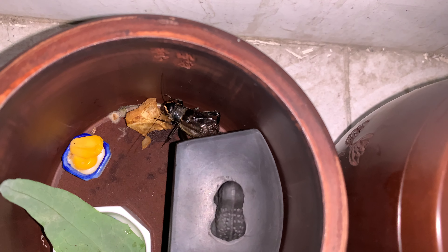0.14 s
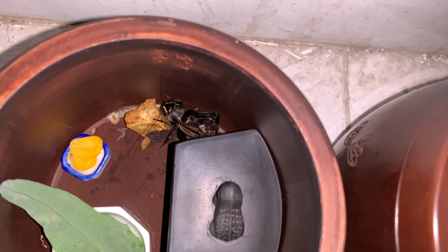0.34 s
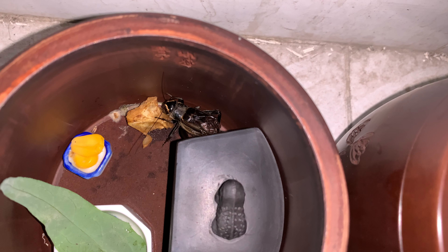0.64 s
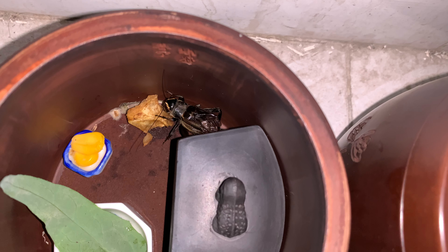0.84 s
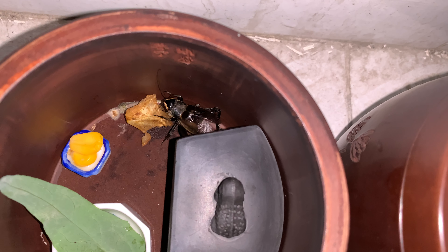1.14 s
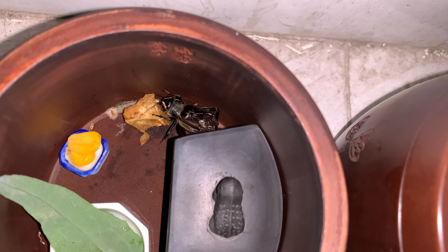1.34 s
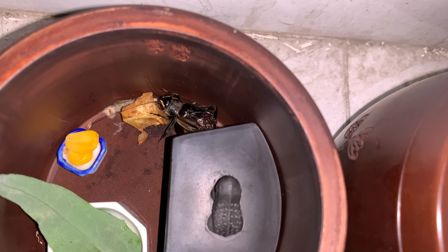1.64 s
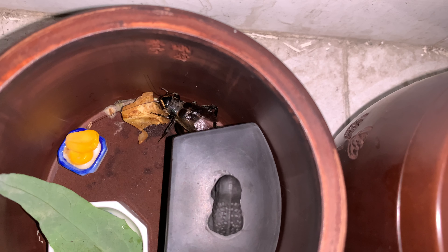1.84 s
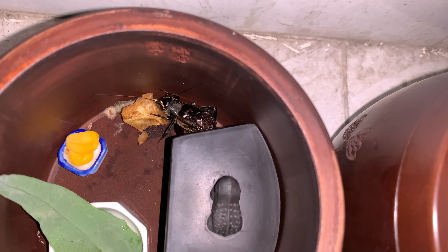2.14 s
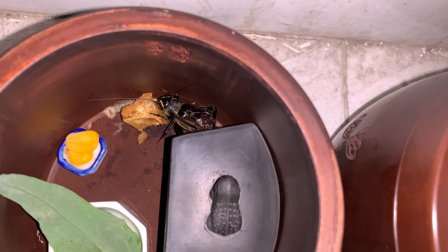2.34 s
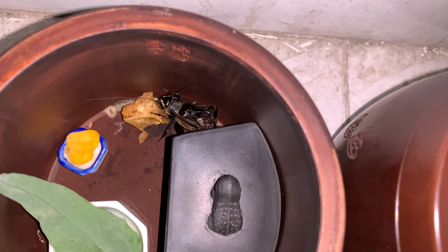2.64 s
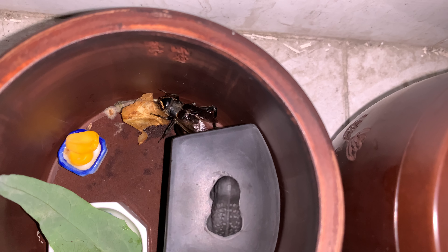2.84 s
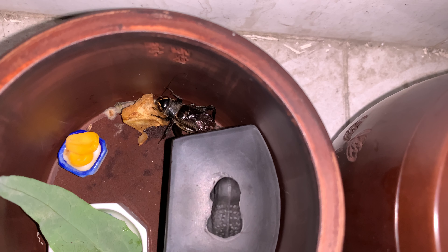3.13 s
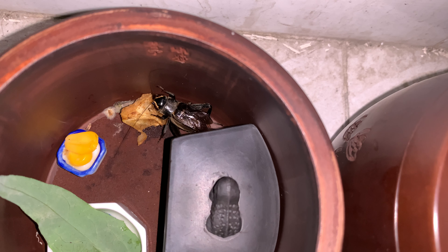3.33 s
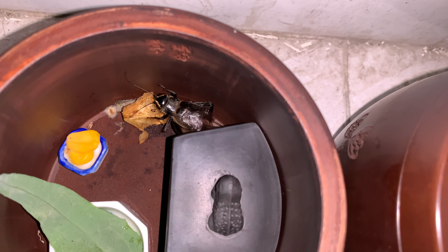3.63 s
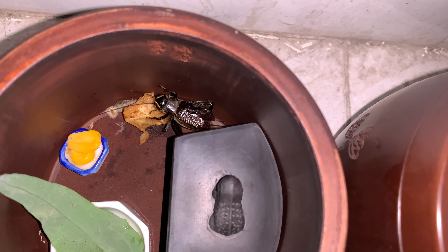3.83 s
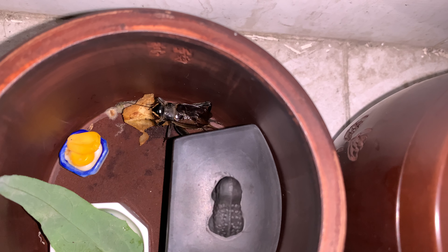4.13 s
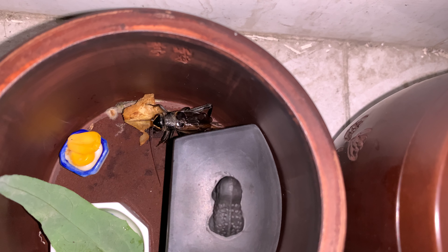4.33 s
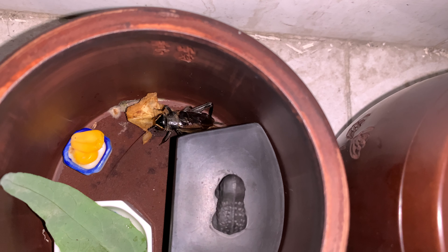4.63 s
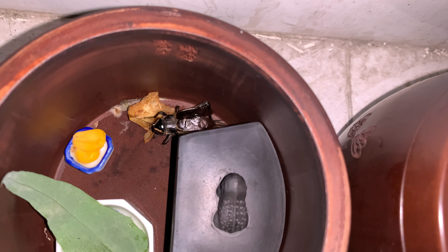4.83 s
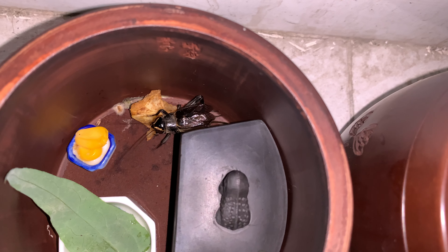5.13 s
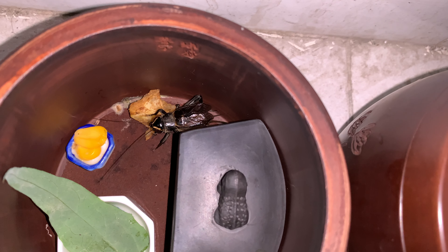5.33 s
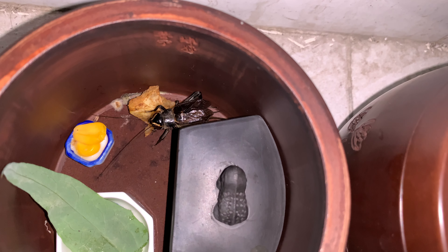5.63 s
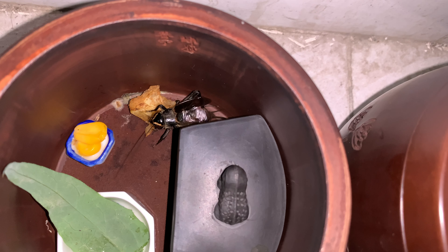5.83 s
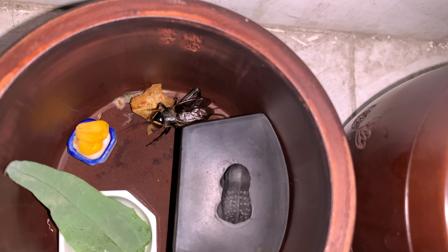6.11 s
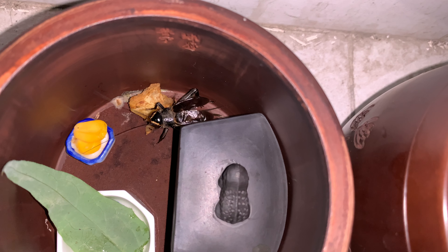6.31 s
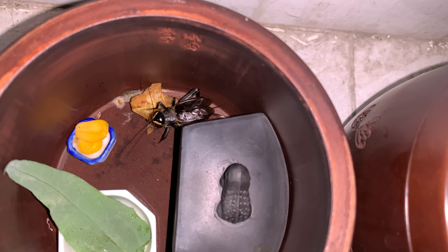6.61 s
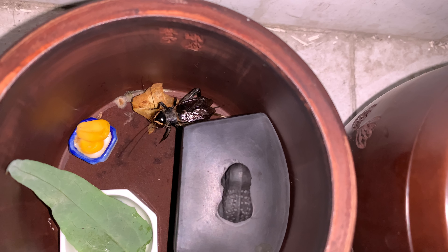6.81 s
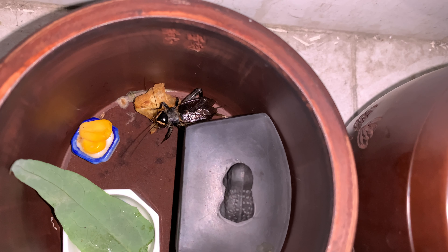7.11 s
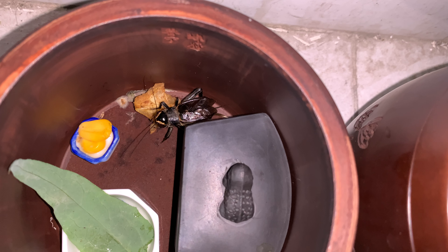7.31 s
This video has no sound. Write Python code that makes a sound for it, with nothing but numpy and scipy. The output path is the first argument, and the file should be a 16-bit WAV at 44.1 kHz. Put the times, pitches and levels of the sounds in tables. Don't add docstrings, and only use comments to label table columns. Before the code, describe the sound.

Loud piercing cricket chirps, each a quick run of raspy pulses, ring inside a clay jar indoors; faint double-pulsed chirps fill some gaps above low room rumble.

```python
import sys
import numpy as np
from scipy import signal
from scipy.fft import rfft, irfft, next_fast_len
from scipy.io import wavfile
from scipy.ndimage import uniform_filter1d, map_coordinates

SR = 44100
rng = np.random.default_rng(int(sys.argv[2]) if len(sys.argv) > 2 else 0)


def invert_db(level):
    return 10 ** (np.asarray(level, dtype=float) / 20)


def generate_wav(sig):
    pcm = np.round(np.clip(np.atleast_2d(sig).T, -1, 1) * 32767).astype(np.int16)
    wavfile.write(sys.argv[1], SR, pcm)


N = 328986


def unit(x):
    return x / np.sqrt(np.mean(x ** 2) + 1e-20)


def along(points, hz):
    point_hz, value = np.transpose(points)
    return np.interp(np.log(hz + 1), np.log(point_hz + 1), value)


def filtered(x, response):
    size = next_fast_len(N + 8192)
    spectrum = rfft(x, size) * response(np.fft.rfftfreq(size, 1 / SR))
    return irfft(spectrum, size)[..., :N]


def noise(spectrum):
    white = rng.standard_normal(N)
    return unit(filtered(white, lambda hz: invert_db(along(spectrum, hz))))


def wobble(rate):
    knots = rng.standard_normal(int(N * rate / SR) + 4)
    return unit(map_coordinates(knots, [np.arange(N) * rate / SR]))


def patchy(x, depth_db):
    z = signal.stft(x, nperseg=128)[2]
    field = uniform_filter1d(rng.standard_normal(z.shape), size=3, axis=0)
    field = uniform_filter1d(field, size=3, axis=1)
    return unit(signal.istft(z * invert_db(depth_db * unit(field)), nperseg=128)[1][:N])


def add(track, s, piece):
    track[round(s * SR):][:len(piece)] += piece


# level in dB, t60 in seconds.
EARLIER_TAIL = (-53.5, .7)


def earlier():
    db, t60 = EARLIER_TAIL
    ring = noise([(3800, -39), (4050, -3), (4300, 0.5), (4450, -4), (4650, -41.5)])
    return invert_db(db - 60 * np.arange(N) / SR / t60) * ring


# frequency in Hz, density in dB per Hz.
HISS_SPECTRUM = [(2500, -35), (3300, -5), (4600, -2), (5400, -11.5), (7000, -16.5), (9000, -18),
                 (11000, -24), (14000, -15), (15200, -33.5), (15500, -39.5)]


def hiss():
    return invert_db(-78.0) * noise(HISS_SPECTRUM)


# time in seconds, level in dB, relative deep rumble in dB.
VENTILATION = [(0.0, -51.5, 0.5), (0.899, -54.5, -1), (1.7, -53.5, 0), (2.299, -54.5, 0.5),
               (2.9, -54.5, 2.5), (3.4, -54.5, -1.5), (4.3, -56, 0.5), (5.0, -55.5, 4), (5.6, -56.5, -1),
               (6.4, -55.5, 1.5), (7.46, -55.5, -2.5)]
# frequency in Hz, density in dB per Hz.
HUM_COMMON = [(15, -54), (25, -22), (66, 1.5), (119, 0.5), (173, -7), (208, -5.5), (240, -9.5), (271, -8),
              (418, -16.5), (524, -22), (713, -19), (1100, -21), (1240, -18.5), (1590, -23.5),
              (3400, -38.5), (4420, -60), (7480, -120)]
# frequency in Hz, density in dB per Hz.
HUM_DIFFERENCE = [(35, -42.5), (60, -9), (220, -8), (289, -2), (448, -3.5), (731, -1.5), (823, -5.5),
                  (1260, -7), (1820, -12.5), (3400, -19), (4420, -55), (7480, -120)]
# centre in Hz, width in Hz, gain in dB.
MODES = [(70, 2.9, 7), (424, 23, 6), (866, 68, -10), (1980, 140, 3.5)]
# frequency in Hz, left minus right in dB.
BALANCE = [(60, 0), (110, -0.5), (200, 2), (380, -1.5), (700, -2.0), (1290, -0.5), (2380, -0.5),
           (4400, -1.5), (8120, 1.5), (15000, -5)]


def room(song):
    duck_db, duck_s, loud_db = 6, .12, -18
    s, db, deep_db = np.transpose(VENTILATION)
    now = np.arange(N) / SR
    keep = np.exp(-1 / (duck_s * SR))
    loud = signal.lfilter([1 - keep], [1, -keep], np.abs(song)) / invert_db(loud_db)
    level = invert_db(np.interp(now, s, db) + 3.5 + 0.66 * wobble(8) - duck_db * np.tanh(loud))
    mid, side = noise(HUM_COMMON), invert_db(-12) * noise(HUM_DIFFERENCE)
    mid = filtered(mid, lambda hz: invert_db(sum(gain * np.exp(-((hz - c) / w) ** 2) for c, w, gain in MODES)))
    deep = filtered(mid, lambda hz: 1 / (1 + (hz / 105) ** 6))
    mid = mid + deep * (invert_db(np.interp(now, s, deep_db - np.mean(deep_db))) - 1)
    left_right = np.array([mid + side, mid - side])
    return level * filtered(left_right, lambda hz: invert_db(np.outer([.5, -.5], along(BALANCE, hz))))


# start in seconds, peak in dB, extra low ring in dB.
SCRAPER_CATCHES = [(0.0392, -39, 14.5), (1.1046, -33.5, -4.5), (1.2052, -32.5, -15.5), (1.2163, -16, -2.5),
                   (1.6944, -61, -8), (1.9051, -33.5, -2), (1.9565, -30, 1), (1.9986, -29.5, -7),
                   (2.0074, -24.5, 1.5), (2.8971, -32, -4), (2.9225, -35, 7.5), (2.9582, -24, -2),
                   (3.588, -25, -9), (4.8845, -43, -3), (4.8991, -20, 0), (4.9357, -23, -2.5),
                   (4.974, -36, -12), (4.9835, -17, -8), (4.9937, -18.5, -8), (5.7986, -44, -8),
                   (5.8054, -44, 3), (5.8456, -45, 16), (6.3574, -40.5, 8), (6.3754, -33, -2)]


def catches():
    t = np.arange(SR // 10) / SR
    scrape, ring = np.zeros(N), np.zeros(N)
    for s, db, ring_db in SCRAPER_CATCHES:
        add(scrape, s, invert_db(db - 3.0 - 60 * t / .024) * (1 - np.exp(-t / 0.0015)))
        add(ring, s, invert_db(db + ring_db - 15.5 - 60 * t / 0.14) * (1 - np.exp(-t / 0.0007)))
    return scrape, ring


# start in seconds, length in seconds,
# starting tooth rate in Hz, peak in dB, level near the end in dB.
OPENING_STROKES = [(0.0546, 0.021, 4430, -16.5, -21.5), (0.084, 0.0262, 4493, -16, -19.5),
                   (0.115, 0.026, 4497, -15, -17.5), (0.148, 0.028, 4493, -12.5, -16.5),
                   (0.1828, 0.0306, 4330, -10, -19), (1.126, 0.0217, 4440, -19, -24),
                   (1.165, 0.025, 4450, -17.5, -17), (1.9247, 0.017, 4420, -19, -21.5),
                   (1.9592, 0.031, 4446, -12, -17.5), (2.9192, 0.02, 4493, -18.5, -22.5),
                   (2.956, 0.04, 4560, -8.5, -22), (3.594, 0.011, 3980, -14, -21),
                   (3.625, 0.024, 4250, -10.5, -19.5), (3.6648, 0.03, 4460, -8.5, -15.5),
                   (4.9372, 0.0261, 4527, -17, -15.5), (4.9747, 0.036, 4765, -7, -16.5),
                   (5.8073, 0.021, 4383, -22, -19), (5.8443, 0.033, 4740, -9, -12.5),
                   (6.3775, 0.017, 4585, -19, -23), (6.4052, 0.03, 4633, -15, -15),
                   (6.4475, 0.033, 4590, -9, -13)]
# end in seconds, peak in dB, level near the end in dB.
FULL_STROKES = [(1.2424, -7, -39.5), (1.29, -9, -21), (1.3382, -8.5, -27), (1.3888, -8.5, -20.5),
                (2.0387, -6.5, -21), (2.0838, -7.5, -28.5), (2.1344, -10, -24), (3.0391, -7.5, -23.5),
                (3.0872, -8.5, -21.5), (3.1344, -9, -19), (3.7925, -10.5, -23.5), (5.0606, -8, -19.5),
                (5.1121, -10, -19), (5.163, -11, -17.5), (5.9241, -8, -18.5), (5.9733, -9.5, -17),
                (6.0223, -10.5, -15.5), (6.5285, -8.5, -18.5), (6.5736, -9, -14.5)]
# start in seconds, length in seconds, starting tooth rate in Hz,
# peak in dB, level near the end in dB, octave in dB.
SLIPPED_STROKE = (3.7088, .041, 4500, -6.5, -15, -29)


def strokes():
    rows = []
    for s, length, start_hz, peak_db, late_db in OPENING_STROKES:
        rows.append((s, length, start_hz, peak_db, late_db, -29.5 + 0.68 * (late_db + 17)))
    full_s, full_hz = .0355, 4587
    for end, peak_db, late_db in FULL_STROKES:
        octave_db = -34.5 + 0.31 * (late_db + 14.5)
        rows.append((end - full_s, full_s, full_hz, peak_db, late_db, octave_db))
    return [*rows, SLIPPED_STROKE]


# centre in Hz, half width in Hz.
MEMBRANE = (4341, 130)
# frequency in Hz, gain in dB.
OCTAVE_FRONT = [(7600, -18.5), (8100, -2), (8400, 1.5), (8700, -6), (9200, 0)]
# frequency in Hz, gain in dB.
TWELFTH_FRONT = [(11700, -24), (12150, -5.5), (12600, 2.5), (13050, -1.5), (13350, -12.5), (13900, -11.5)]
# frequency in Hz, gain in dB.
OCTAVE_BACK = [(7600, -20.5), (8100, 2), (8350, -2), (8550, -2.5), (8800, -4.5), (9050, 5.5), (9400, -2.5)]
# frequency in Hz, gain in dB.
TWELFTH_BACK = [(11700, -24), (12150, -9), (12600, 3.5), (13050, -5.5), (13350, -10), (13700, -2.5),
                (14200, 3)]


def stroke_tone(t, row, flutter):
    s, length, start_hz, peak_db, late_db, octave_db = row
    u = t / length
    octave, twelfth = (OCTAVE_FRONT, TWELFTH_FRONT) if s < 4.5 else (OCTAVE_BACK, TWELFTH_BACK)
    stall_hz = 3826
    fall = .4 * u + (1 - .4) * u * np.abs(u)
    hz = start_hz - (start_hz - stall_hz) * fall + 12 * flutter[round(s * SR):][:len(t)]
    phase = 2 * np.pi * np.cumsum(hz) / SR
    contact = np.clip(np.arange(len(t)) / SR / (0.52 * length), 0, 1) ** 0.79
    contact = contact * np.clip((length + 0.00076 - t) / 0.0036, 0, 1)
    if s < SLIP_EVENT[0]:
        contact = contact * np.clip((SLIP_EVENT[0] + .001 - s - t) / 0.0013, 0, 1)
    centre_hz, half_width_hz = MEMBRANE
    resonance = 1 / (1 + ((hz - centre_hz) / half_width_hz) ** 2)
    first = invert_db(late_db - 3.5) + np.maximum(invert_db(peak_db) - invert_db(late_db), 0) * resonance
    twelfth_db = -26.0 + 1.4 * min(peak_db + 14, 0)
    bite = np.clip(u / .15, .4, 1) * np.clip((length - t) / .006, 0, 1)
    wave = first * np.sin(phase)
    wave = wave + bite * invert_db(octave_db + along(octave, 2 * hz)) * np.sin(2 * phase + 1)
    wave = wave + bite * invert_db(twelfth_db + along(twelfth, 3 * hz)) * np.sin(3 * phase + 2)
    return contact * wave


def stroke_grip(t, length, peak_db):
    landing = 2.0 * np.exp(-((t - .0015) / 0.0043) ** 2)
    slowing = 0.68 * np.exp(-((t / length - .75) / 0.31) ** 2)
    onset = np.clip((t + 0.0017) / 0.004, 0, 1)
    return invert_db(-43 + 0.34 * peak_db) * (landing + 0.68 + slowing) * onset


def jar_air(tone):
    hollow = noise([(1500, -43.5), (1800, -1.5), (1900, 4.5), (2000, -8.5), (2400, -41.5)])
    loudness = uniform_filter1d(np.abs(tone), size=2000)
    return invert_db(-73 + 4 * wobble(30)) * hollow * np.minimum(loudness / .03, 1)


# frequency in Hz, density in dB per Hz.
RASP_SPECTRUM = [(3000, -36), (3450, -15), (3900, -6), (4500, -4), (4850, -2), (5300, -11), (5800, -9),
                 (6350, -1), (7400, -19), (8400, -8), (9650, -20), (10100, -10), (11200, -5.5),
                 (13900, -14.5), (15300, -5.5), (15800, -8.5), (16050, -41)]


def singer():
    tone, flutter = np.zeros(N), wobble(350)
    friction, ring = catches()
    lead = .003
    reopening = np.arange(SR // 30) / SR
    for row in strokes():
        s, length, peak_db = row[0], row[1], row[3]
        t = np.arange(round((length + 0.0033) * SR)) / SR - lead
        add(tone, s - lead, stroke_tone(t, row, flutter))
        add(friction, s - lead, stroke_grip(t, length, peak_db))
        add(friction, s + length, invert_db(-48.5 + 0.61 * peak_db - 60 * reopening / 0.14))
    scuff = noise([(3200, -41.0), (3500, -9), (3800, 1.5), (4200, -5), (4600, -40.0)])
    grain = invert_db(2.3 * wobble(500))
    rasp = friction * unit(grain * patchy(noise(RASP_SPECTRUM), depth_db=5.0))
    wings = tone + ring * scuff + rasp
    return jar_air(tone) + filtered(wings, lambda hz: 1 / (1 + (3400 / (hz + 1)) ** 18))


# start in seconds, tone in dB.
ANSWER_PULSES = [(0.559, -54), (0.632, -47.5), (0.692, -40), (0.752, -38), (0.812, -37), (0.876, -37.5),
                 (1.767, -53.5), (2.187, -48), (2.25, -39), (2.31, -38.5), (2.368, -38), (2.43, -37),
                 (3.864, -56.5), (3.953, -45.5), (4.015, -39.5), (4.077, -39), (4.139, -39), (4.202, -40.5),
                 (5.758, -53), (6.071, -41.5)]


def answerer():
    out, t, blur = np.zeros(N), np.arange(round(0.063 * SR)) / SR, wobble(390)
    scratch = patchy(noise(RASP_SPECTRUM), depth_db=-0.5)
    half_partials = ((6330, 3.0), (10250, -16), (12450, -17), (14500, -20.0))  # (Hz, dB)
    half = sum(invert_db(level) * np.sin(2 * np.pi * hz * t) for hz, level in half_partials)
    steady = 2 * np.pi * 4335 * t
    octave_db = -51.5
    even_db, uneven_db = -72.5, -62.5
    for s, tone_db in ANSWER_PULSES:
        weak_db = max(-39.5 - tone_db, 0)
        twelfth_db = -52.5 - 1.3 * weak_db
        half_db = even_db + (uneven_db - even_db) * min(weak_db / 5, 1)
        for start, rise, db in ((s, .004, -6), (s + .014, .0075, 0)):
            here = slice(round(start * SR), round(start * SR) + len(t))
            swell = (t / rise) ** 3 * np.exp(3 * (1 - t / rise))
            smear = np.clip(t / .002, 0, 1) * np.exp(-(t / (2.6 * rise)) ** 3) * invert_db(4.3 * blur[here])
            falling_hz = 4310 - 190 * np.clip(t / (1.8 * rise), 0, 1)
            falling = 2 * np.pi * np.cumsum(falling_hz) / SR
            wave = invert_db(db) * swell * invert_db(tone_db) * np.sin(steady)
            wave = wave + invert_db(db) * swell ** 2 * invert_db(twelfth_db) * np.sin(3 * steady)
            wave = wave + smear * invert_db(octave_db - 9) * np.sin(2 * falling)
            wave = wave + smear * invert_db(octave_db - 23.5) * scratch[here]
            add(out, start, wave + smear * invert_db(half_db - 4.5) * half)
    return out


# start in seconds, length in seconds, level in dB.
SLIP_EVENT = (3.7283, .009, -17.5)
# frequency in Hz, density in dB per Hz.
RATTLE_SPECTRUM = [(2500, -31.5), (3500, -18), (4300, 14), (6400, -0.5), (8500, -17.5), (10000, 5.5),
                   (15500, 2), (16000, -17), (16300, -43.5)]


def rattle():
    s, length, db = SLIP_EVENT
    t = np.arange(N) / SR - s
    decay = invert_db(-500 * np.maximum(t, 0) - 7330 * np.maximum(t - length, 0))
    shape = np.clip(t / 0.0023 + 1, 0, 1) * decay
    return invert_db(db) * shape * unit(invert_db(1.9 * wobble(1100)) * noise(RATTLE_SPECTRUM))


# delay in seconds, level in dB.
JAR_WALLS = [(.0012, -21), (.0027, -27), (.0046, -12), (.0075, -19), (0.01, -25)]
# frequency in Hz, t60 in seconds, level in dB.
ROOM_DECAY = [(3000, 0.44, -4), (3840, 0.71, -3.5), (4088, 0.88, -5), (4940, .4, -2.5), (6500, 0.23, -4),
              (8050, 0.22, -7), (12300, 0.15, -22), (16000, .15, -17.5)]


def echoes(x, wet_db):
    centre, t60, db = np.transpose(ROOM_DECAY)

    def walls(hz):
        delayed = sum(invert_db(gain) * np.exp(-2j * np.pi * hz * s) for s, gain in JAR_WALLS)
        return 1 + invert_db(np.interp(hz, centre, db)) * delayed

    hz, t, z = signal.stft(rng.standard_normal(SR), SR, nperseg=256)
    fading = invert_db(-60 * t / np.interp(hz, centre, t60)[:, None]) + 8.9 * invert_db(-60 * t / 0.1)
    colour = invert_db(np.interp(hz, centre, db))[:, None]
    tail = signal.istft(z * fading * colour, SR, nperseg=256)[1]
    wet = signal.fftconvolve(np.pad(x, (300, 0)), tail / np.linalg.norm(tail))[:N]
    return invert_db(1.43) * filtered(x, walls) + invert_db(wet_db) * wet


# frequency in Hz, phase in radians.
LEFT_LEAD = [(1500, 0), (3750, 1.9), (4050, 2.1), (4400, 2.6), (4700, 3.14), (5400, 3.9), (6100, 5.65),
             (6800, 6.25), (7500, 6.5), (7850, 7.9), (8870, 9.4), (9600, 10), (10250, 11.5), (10950, 12.55),
             (12300, 14.6), (13300, 15.7), (14000, 16.9), (14550, 18.5), (15400, 18.85)]


def widened(x):
    return filtered(x, lambda hz: np.exp(.5j * np.outer([1, -1], along(LEFT_LEAD, hz))))


def scene():
    crickets = echoes(singer() + rattle(), wet_db=-17) + echoes(answerer(), wet_db=-17.5)
    return widened(crickets + hiss() + earlier()) + room(crickets)


def low_pass(x):
    return signal.sosfilt(signal.butter(12, 16820, fs=SR, output="sos"), x)


def record(dry):
    limited = filtered(dry, lambda hz: invert_db(-32 * np.clip((hz - 15880) / 200 + .5, 0, 1)))
    return low_pass(limited)


dry = scene()
out = record(dry)
generate_wav(out)
```